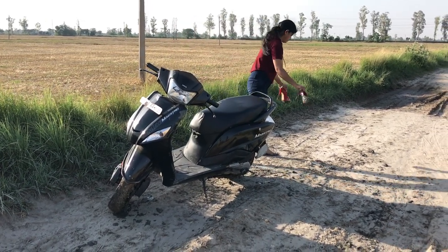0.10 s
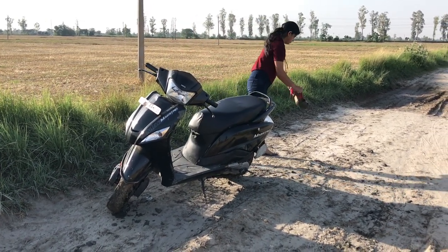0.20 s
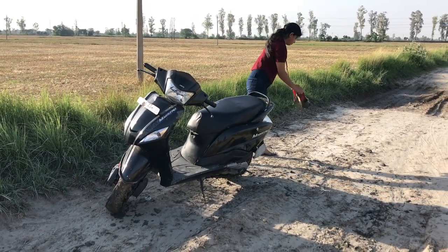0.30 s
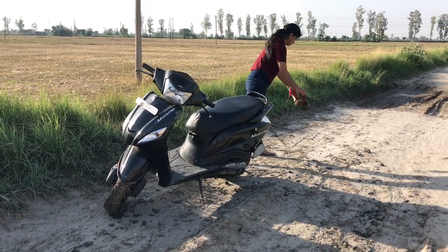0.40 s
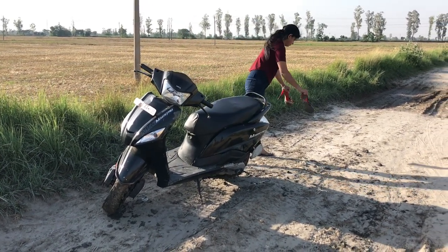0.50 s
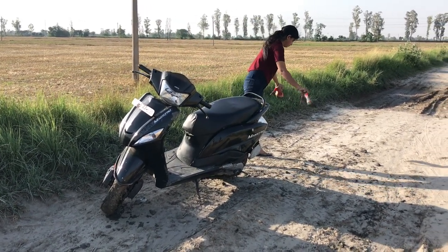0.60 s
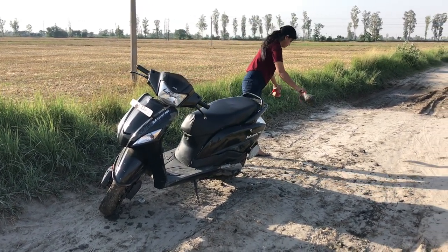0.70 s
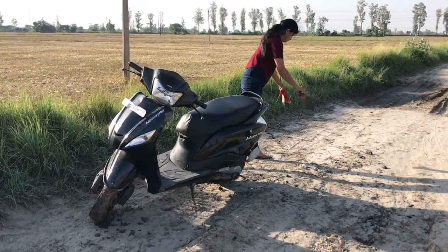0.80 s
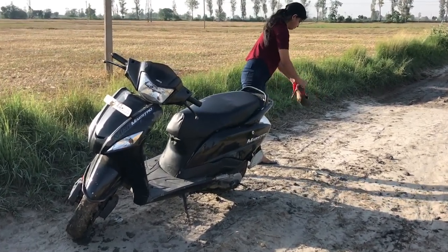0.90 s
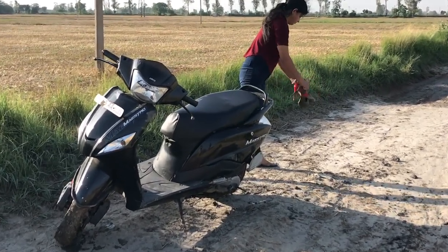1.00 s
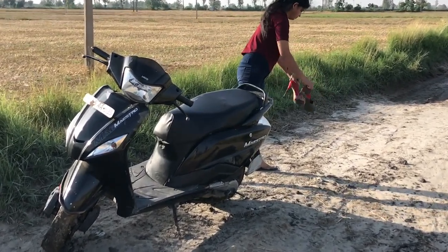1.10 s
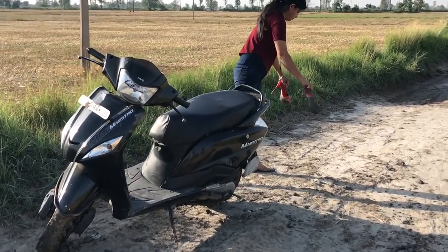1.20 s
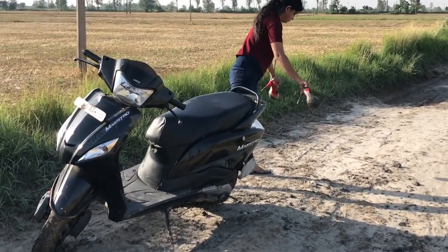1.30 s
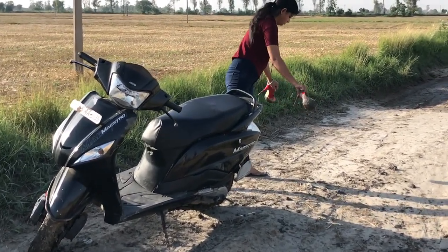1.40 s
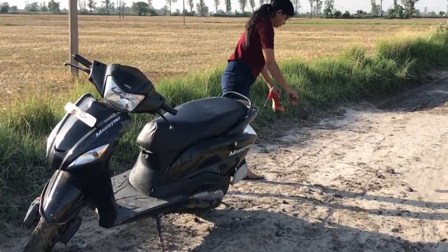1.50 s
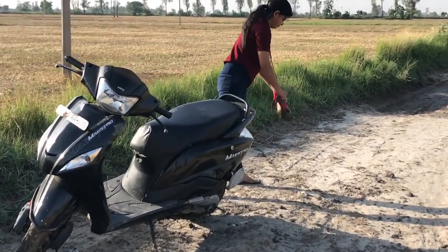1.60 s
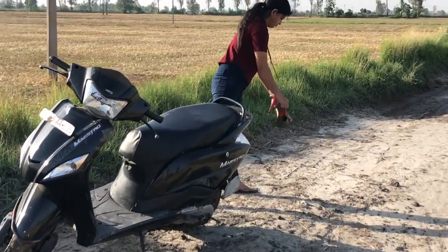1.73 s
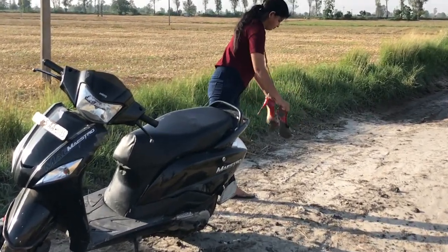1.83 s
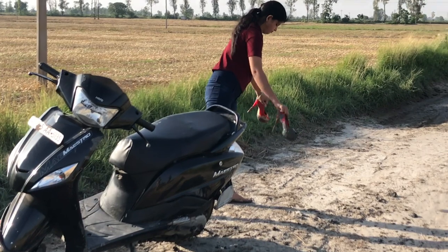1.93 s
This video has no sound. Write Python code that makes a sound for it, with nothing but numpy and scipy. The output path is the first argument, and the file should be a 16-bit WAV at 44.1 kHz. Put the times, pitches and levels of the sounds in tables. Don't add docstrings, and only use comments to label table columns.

```python
import sys
import numpy as np
from scipy import signal
from scipy.fft import rfft, irfft
from scipy.io import wavfile

SR = 44100
rng = np.random.default_rng(int(sys.argv[2]) if len(sys.argv) > 2 else 0)


def master_out(mix):
    frames = np.transpose(np.atleast_2d(mix))
    ceiling = np.clip(frames, -1, 1)
    pcm = np.round(ceiling * 32767).astype(np.int16)
    wavfile.write(sys.argv[1], SR, pcm)


def voltage_ratio(level):
    return 10 ** (np.asarray(level, float) / 20)


N = 85995
T = np.arange(N) / SR

# frequency in Hz, level in dB per Hz.
FIELD_COLOUR = [(110, 3), (180, 0), (251, -1), (277, -5.5), (318, -12.5), (504, -12.5), (1040, -13.5),
                (2260, -26), (5000, -39), (6500, -54), (11000, -120)]
# time in seconds, level in dB.
FIELD_SWELL = [(0, -50.5), (.34, -48), (.45, -49.5), (.58, -49.5), (1.1, -49), (1.45, -50), (1.7, -48.5),
               (1.95, -49)]
# frequency in Hz, level in dB per Hz.
HISS_COLOUR = [(2350, -3), (4000, -7.5), (7230, -6.5), (7750, -7.5), (8550, -4), (10300, -11.5),
               (12500, -1), (14800, -5.5), (16000, -5.5)]
# time in seconds, level in dB.
HISS_SWELL = [(0.0, -59), (0.358, -59.5), (0.874, -57.5), (1.406, -58.5), (1.95, -59)]
# frequency in Hz, level in dB per Hz.
RUSTLE_COLOUR = [(500, 2), (800, -5), (1200, 11), (1800, 3.5), (2600, -21.5), (4000, -14)]
# time in seconds, level in dB.
RUSTLE_GUSTS = [(0, -52.5), (.06, -57), (.12, -68), (.40, -62), (.45, -49.5), (.52, -65), (.68, -53),
                (.8, -75), (1.1, -58), (1.2, -55), (1.27, -59), (1.33, -52), (1.47, -51), (1.55, -56.5),
                (1.75, -57), (1.85, -55), (1.95, -57)]
# time in seconds, top pitch in Hz, fall of each chirp in Hz, level in dB.
TRILL = [(0, 8480, 750, -61), (.27, 8430, 750, -61), (.30, 8600, 500, -70), (.62, 8100, 500, -76),
         (.66, 8000, 850, -66), (.86, 8100, 900, -63), (1.03, 8450, 800, -60), (1.05, 8600, 1900, -62),
         (1.245, 8500, 1700, -61), (1.26, 8700, 400, -72), (1.95, 8800, 400, -70)]
# time in seconds, rate in chirps per second.
TRILL_RATE = [(0, 53.9), (.27, 53.9), (.28, 54.2), (.66, 54.2), (.67, 52.3), (1.035, 54.2), (1.045, 113),
              (1.25, 111), (1.26, 55)]
# time in seconds, level in dB.
WIND_GUSTS = [(0.0, -31), (0.038, -39), (0.228, -35), (0.26, -32), (0.33, -27.5), (0.368, -27.5),
              (0.396, -38.5), (0.548, -30), (0.646, -34), (0.782, -35.5), (0.824, -30.5), (0.878, -38.5),
              (0.912, -30.5), (1.042, -40.5), (1.374, -34), (1.412, -42.5), (1.504, -34.5), (1.95, -38)]
# frequency in Hz, level in dB per Hz.
WIND_COLOUR = [(12, -53), (20, -8.5), (60, 5), (134, -5), (249, -14.5), (280, -36), (330, -11), (430, -56),
               (730, -120)]
# start in seconds, level
# in dB, pitch in Hz, length in cycles.
BUFFETS = [(0.147, -27, 95, 3.3), (0.203, -23.5, 110, 1), (0.2432, -7.5, 201, 3.08), (0.24, -17, 323, 4),
           (0.2419, -30.5, 513, 3.3), (0.256, -16.5, 77, 2.48), (0.293, -18.5, 84.4, 1.55),
           (0.347, -18, 68.5, 1.93), (0.516, -32, 205, 1.7), (0.8094, -22.5, 158, 1.45),
           (0.819, -28, 53, 0.55), (0.9054, -21, 98, 1.8), (1.661, -29.5, 180, 3.7)]
# start in seconds, level in dB, length in seconds,
# lowest and highest frequency in Hz.
CRUMBS = [(0.275, -39, 0.0042, 2000, 15000), (0.317, -33, 0.0046, 10700, 17000),
          (.3274, -33, 0.00091, 3500, 17000), (0.3283, -32, 0.0065, 9200, 16800),
          (.4040, -44, 0.0033, 9150, 17000), (0.427, -43, .002, 2200, 3200),
          (0.439, -39, 0.0022, 1400, 3000), (0.445, -42, 0.0017, 2200, 3600), (.4520, -38, .006, 800, 1300),
          (.4530, -43, .0015, 2200, 4000), (0.464, -36, 0.0022, 1300, 3600),
          (0.472, -49, .0015, 1500, 6500), (.4825, -45, .0015, 2200, 6000), (0.562, -44, .0012, 2500, 4800),
          (.5675, -37, 0.0016, 2200, 5000), (0.5792, -31.5, 0.00058, 1600, 5470),
          (0.597, -44.5, 0.0082, 7000, 17000), (0.642, -33.5, 0.0018, 2600, 4160),
          (0.653, -33, 0.0018, 900, 2000), (.6572, -31.5, 0.00064, 5000, 18200),
          (.6572, -31, .002, 500, 1500), (.6572, -42, .001, 1500, 3500), (.6770, -38, .0015, 2800, 4000),
          (.6810, -34, 0.0026, 1100, 2200), (0.694, -43, .0015, 2300, 4500),
          (0.75, -44, 0.0016, 3200, 4800), (0.7225, -37, 0.0015, 1700, 3200),
          (0.9965, -33, 0.001, 2200, 9000), (0.997, -29.5, 0.0076, 10000, 17000),
          (1.0004, -37, 0.0022, 3000, 9300), (1.004, -32, .0015, 6000, 17000),
          (1.024, -38, 0.0012, 5000, 17000), (1.025, -37, 0.0044, 9000, 17000),
          (1.097, -44.5, .004, 8900, 17000), (1.158, -44, .004, 9050, 16800),
          (1.253, -40, 0.00082, 1500, 4480), (1.3275, -43, 0.0015, 2200, 6500),
          (1.3820, -42, 0.001, 600, 4200), (1.559, -40, 0.0036, 11200, 17000),
          (1.7038, -31.5, 0.0076, 5000, 17000), (1.714, -39.5, 0.0074, 6200, 17000),
          (1.925, -44.5, 0.0045, 8900, 14000)]
# time in seconds, level in dB,
# grit in dB against that level, brightness in dB per octave.
SLAPS = [
    [(.2797, -15, 2, -5), (.2803, 2.5, -15, -17.5), (.2812, 2, -10.5, -18.5), (.2828, -3.5, -10.5, -14.5),
     (.3020, -19.5, -16, 9.5), (.3029, -25.5, -24, 7), (.3038, -17, -23, 6), (.3050, -20.5, 0, -21),
     (.3275, -30, -17, 9.5), (.3287, -40.5, -11, 13.5), (.3300, -19.5, -3, -4)],
    [(.9590, -5.5, -2.5, 4), (.9597, -10, 1, 7.5), (.9607, -6, -8, -2.5), (.9617, -9, -10, -1),
     (.9626, -9.5, -24, -5), (.9655, -29, -30, 11), (.9770, -42, -14, -9.5), (1.0070, -37.5, 1, 5),
     (1.0095, -30, -3, -2.5), (1.0200, -36.5, -1, -6)],
    [(1.6636, -19, 3.5, 4), (1.6644, -8, 0.5, 0), (1.6653, -6, -7.5, -7.5), (1.6663, -4, -11, -9.5),
     (1.6750, -41, -8, -19), (1.6815, -36, 17, 18), (1.6828, -25, 4.5, 14), (1.6846, -17.5, -32, -1),
     (1.7125, -31, -3, 1.5), (1.7150, -35.5, 1, -4), (1.7235, -39, 1, -2)],
]
# frequency in Hz, level in dB, fall by 60 dB in seconds.
SOLES = [
    [(575, -15.5, 0.014), (916, -3.5, 0.0084), (1118, -7.5, 0.02), (1333, -3.5, 0.0147), (1900, -10, 0.01),
     (2660, -8, 0.013), (3370, -36, 0.012), (4400, -53, 0.0068), (5150, -45, 0.0042)],
    [(381, -1, 0.033), (810, 0, 0.0084), (1023, -2, 0.0079), (1486, -12, 0.0093), (1840, -10.5, 0.028),
     (2740, -8.5, 0.004), (3860, -4, 0.0029)],
    [(376, -13, 0.031), (800, -5, 0.0055), (993, 2.5, 0.011), (1300, 0, 0.013), (1450, -7, 0.015),
     (1720, -27, 0.014), (2200, -41, 0.007), (2870, -17, 0.014), (4000, -29, 0.014)],
]
# start in seconds, length in seconds.
PRESSED = [
    (.2860, .012),
    (.9636, .016),
    (1.6680, .012),
]
# frequency in Hz, level in dB per Hz.
GRIT_COLOUR = [(500, 21), (2000, 4.5), (4000, -3.5), (6000, -5.5), (10000, -9.5), (13000, -8), (16000, -13)]

TRILL_START_TURNS, CHIRP_SHARE = .38, .72
CRUMBS_PER_S = 13000
CONTACT_HZ = 5000
CHOKE_DB, CHOKE_S = -7, .0008
GRIT_T60_S, SPRAY_T60_S, SPRAY_DB = 0.0054, 0.065, -19
TICK = 1.2
HOLLOW_HZ = 530
RADIATES_ABOVE_HZ = 650
FULL_SCALE = .9
CUTOFF_HZ, TOP_LEAK_DB = 15800, -27


def rms_one(x):
    return x / np.sqrt(np.mean(x ** 2) + 1e-20)


def in_time(rows):
    s, *columns = np.transpose(rows)
    return [np.interp(T, s, c) for c in columns]


def drift(rate):
    r = np.exp(-2 * np.pi * rate / SR)
    noise = rng.standard_normal(N + SR)
    return rms_one(signal.lfilter([1], [1, -2 * r, r * r], noise)[SR:])


def bandpass(x, low_hz, high_hz):
    return signal.sosfilt(signal.butter(2, [low_hz, high_hz], "band", fs=SR, output="sos"), x)


def coloured(spectrum, patchy_db, rate):
    hz, db = np.transpose(spectrum)
    bands = int(3 * np.log2(hz[-1] / hz[0])) + 1
    edges = np.geomspace(hz[0], min(hz[-1], .45 * SR), bands + 1)
    white = rng.standard_normal((2, N + 8000))
    together = drift(rate / 2)
    out = 0
    for k, (low, high) in enumerate(zip(edges, edges[1:])):
        band = bandpass(white[k % 2], low, high)[8000:]
        out = out + band * voltage_ratio(patchy_db * (.7 * together + drift(rate)))
    bins = np.arange(N // 2 + 1) * SR / N + 1
    colour_db = np.interp(np.log(bins), np.log(hz), db)
    return rms_one(irfft(rfft(out) * voltage_ratio(colour_db), N))


def ring(clicks, hz, t60):
    r, w = voltage_ratio(-60 / (t60 * SR)), 2 * np.pi * hz / SR
    return signal.lfilter([0, np.sin(w)], [1, -2 * r * np.cos(w), r * r], clicks + 1e-18)


def fade(clicks, t60):
    return signal.lfilter([1], [1, -voltage_ratio(-60 / (t60 * SR))], clicks + 1e-18)


def far_fields():
    level_db, = in_time(FIELD_SWELL)
    return voltage_ratio(level_db + 5.5) * coloured(FIELD_COLOUR, patchy_db=0.2, rate=8.0)


def grass_hiss():
    level_db, = in_time(HISS_SWELL)
    return voltage_ratio(level_db + 2) * coloured(HISS_COLOUR, patchy_db=.4, rate=25)


def grass_rustle():
    level_db, = in_time(RUSTLE_GUSTS)
    return voltage_ratio(level_db) * coloured(RUSTLE_COLOUR, patchy_db=4.5, rate=39)


def insect():
    rate, = in_time(TRILL_RATE)
    top_hz, fall_hz, db = in_time(TRILL)
    turns = np.cumsum(rate) / SR + TRILL_START_TURNS
    age = np.clip((turns % 1) / CHIRP_SHARE, 0, 1)
    waver_hz = 40 * drift(60) + 120 * drift(600)
    pitch_hz = top_hz - fall_hz * age ** 1.7 + waver_hz
    tone = np.sin(2 * np.pi * np.cumsum(pitch_hz) / SR)
    swell = np.sin(np.pi * age ** .8) ** .7
    return voltage_ratio(db + 6 + 1.3 * drift(30)) * swell * tone


def wind():
    gust_db, = in_time(WIND_GUSTS)
    out = voltage_ratio(gust_db - 2.0) * coloured(WIND_COLOUR, patchy_db=1.5, rate=6.1)
    for s, level_db, hz, cycles in BUFFETS:
        turn = np.clip((T - s) * hz, 0, cycles)
        swell = np.sin(np.pi * (turn / cycles) ** 0.72)
        pressure = np.sin(2 * np.pi * turn * (1.05 - 0.1 * turn / cycles) - .6)
        out += voltage_ratio(level_db) * swell * pressure
    return out


def crumbs():
    lands = rng.random(N) < CRUMBS_PER_S / SR
    weight = voltage_ratio(2.0 * rng.exponential(1, N).clip(0, 4))
    grains = rms_one(lands * rng.standard_normal(N) * weight)
    out = np.zeros(N)
    for s, db, length, low_hz, high_hz in CRUMBS:
        shower = grains * (T >= s) * np.exp(-((T - s) / length) ** 2)
        shower[int(s * SR)] = 4.0
        out += voltage_ratio(db) * bandpass(shower + 1e-18, low_hz, high_hz)
    return out


def choke(ringing):
    for s, length in PRESSED:
        corners = [s, s + CHOKE_S, s + CHOKE_S + length, s + 2 * CHOKE_S + length]
        ringing = ringing * voltage_ratio(CHOKE_DB * np.interp(T, corners, [0, 1, 1, 0]))
    return ringing


def mud(cracks):
    envelope = fade(cracks, GRIT_T60_S) + voltage_ratio(SPRAY_DB) * fade(cracks, SPRAY_T60_S)
    return coloured(GRIT_COLOUR, patchy_db=0.5, rate=275) * envelope + TICK * np.diff(cracks, prepend=0)


def slaps():
    puff, ringing, cracks = np.zeros(N), np.zeros(N), np.zeros(N)
    soft = np.exp(-2 * np.pi * CONTACT_HZ / SR)
    for contacts, modes in zip(SLAPS, SOLES):
        s, db, grit_db, bright_db = np.transpose(contacts)
        at = (s * SR).astype(int)
        scatter_db = rng.normal(0, 1, (len(s), len(modes)))
        cracks[at] = voltage_ratio(db + grit_db)
        for k, (hz, mode_db, t60) in enumerate(modes):
            tilt_db = bright_db * np.log2(hz / 1000)
            clicks = np.zeros(N)
            clicks[at] = voltage_ratio(db + mode_db + scatter_db[:, k] + tilt_db)
            if k == 0:
                puff += ring(ring(clicks, hz, t60), hz, t60 / 2) * hz / SR
            else:
                softened = signal.lfilter([1 - soft], [1, -soft], clicks)
                ringing += ring(softened, hz, t60)
    soles = choke(ringing) + mud(cracks)
    soles = signal.lfilter(*signal.iirnotch(HOLLOW_HZ, 2.5, fs=SR), soles)
    no_bass = signal.butter(2, RADIATES_ABOVE_HZ, "high", fs=SR, output="sos")
    return puff + signal.sosfilt(no_bass, soles)


def scene():
    background = far_fields() + grass_hiss() + grass_rustle() + insect()
    return (background + wind() + crumbs() + slaps())[None]


def top_cut(x):
    return signal.sosfilt(signal.butter(12, 17030, fs=SR, output="sos"), x)


def record(dry):
    x = np.clip(1.65 * np.tanh(dry / 1.564), -FULL_SCALE, FULL_SCALE)
    treble_cut = signal.ellip(8, .5, -TOP_LEAK_DB, CUTOFF_HZ, fs=SR, output="sos")
    x = signal.sosfilt(treble_cut, x)
    return top_cut(x)


dry = scene()
out = record(dry)
master_out(out)
```